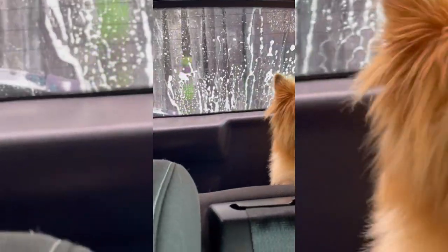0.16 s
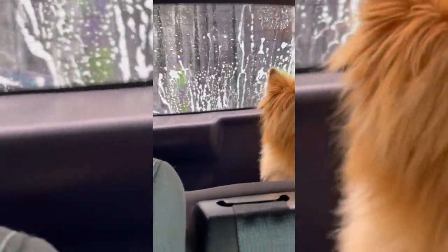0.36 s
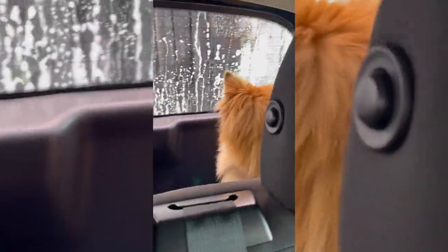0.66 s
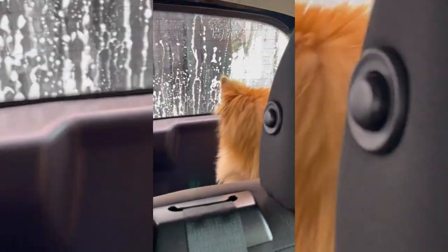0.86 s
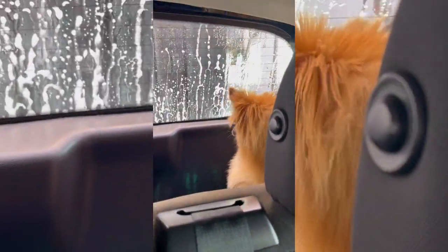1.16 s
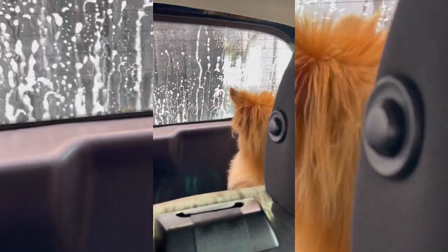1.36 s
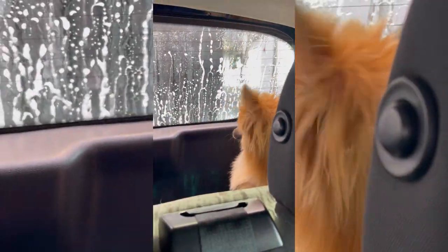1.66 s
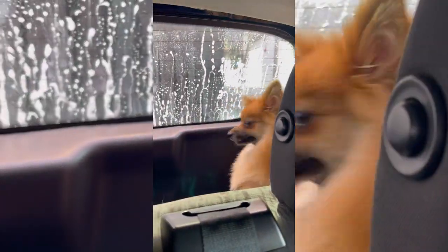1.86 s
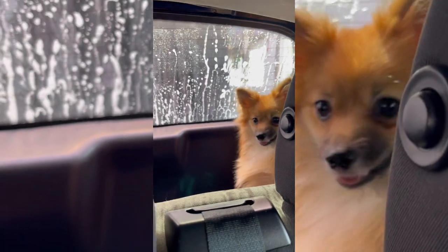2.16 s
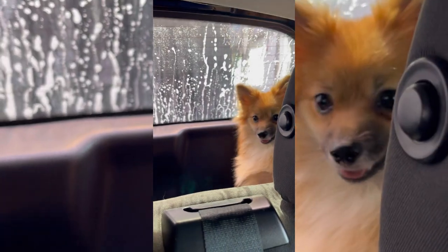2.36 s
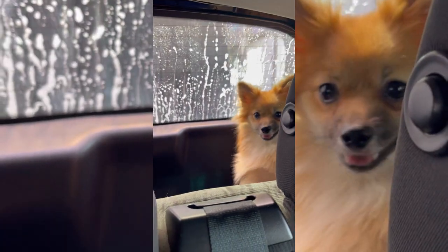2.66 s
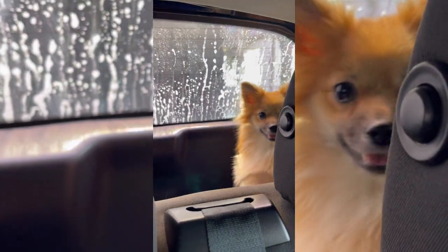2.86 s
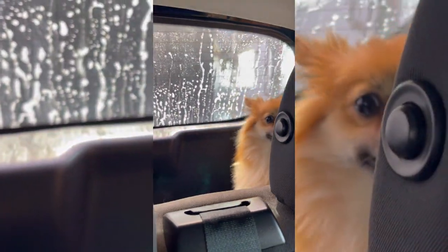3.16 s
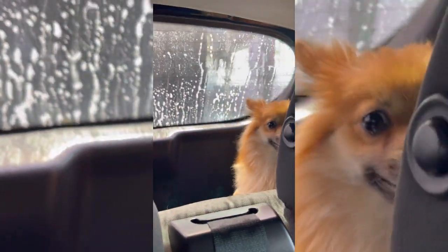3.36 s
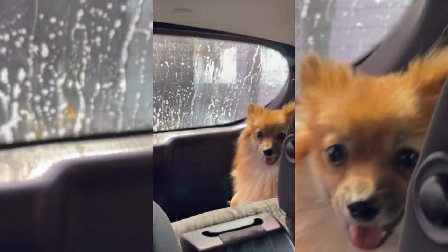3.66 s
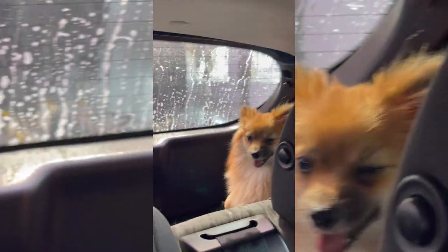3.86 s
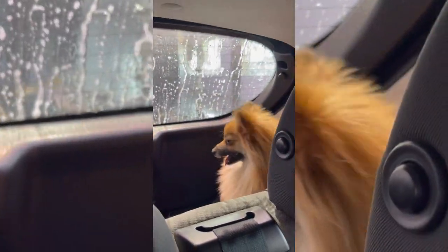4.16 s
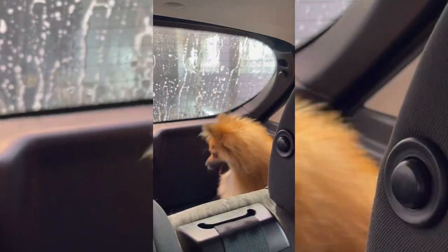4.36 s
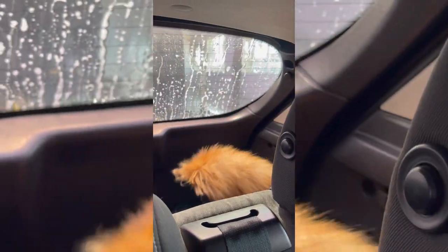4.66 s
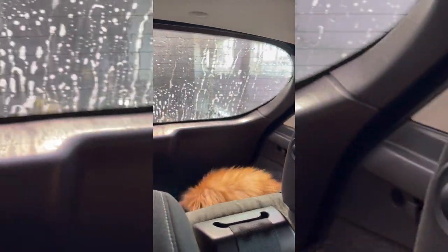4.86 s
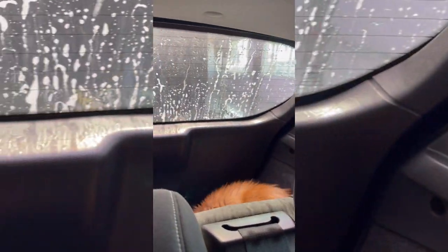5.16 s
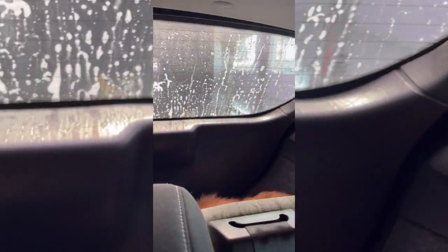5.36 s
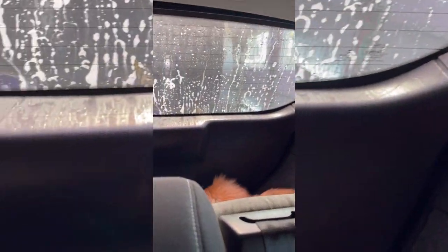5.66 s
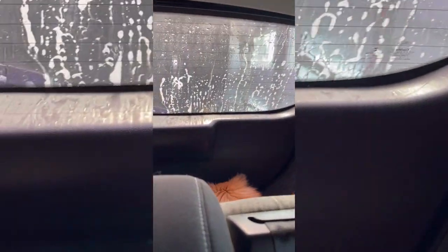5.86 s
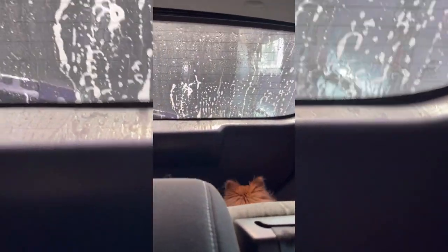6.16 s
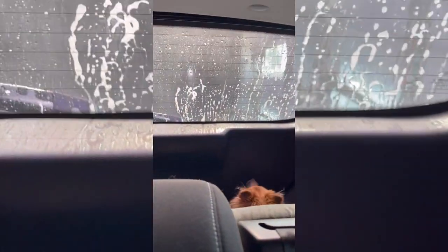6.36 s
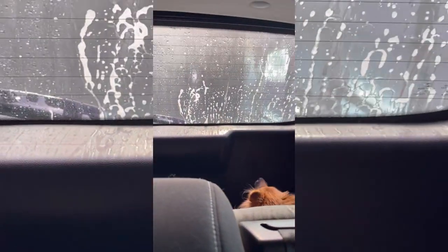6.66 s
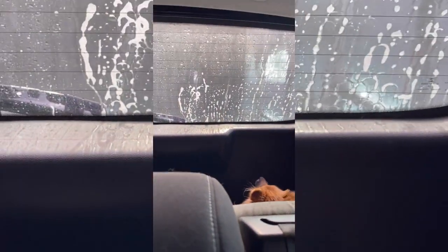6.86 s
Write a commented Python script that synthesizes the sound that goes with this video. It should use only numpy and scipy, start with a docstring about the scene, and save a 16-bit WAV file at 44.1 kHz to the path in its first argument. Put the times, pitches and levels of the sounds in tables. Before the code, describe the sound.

The sound is heard from inside a closed car in an automatic wash. Throughout, pumps make a deep, steady rumble with an uneven drone and a faint wavering motor whine, while water rushes outside, dulled by the windows. From about 0.7 seconds, jets hiss out and back twice a second, strongest around 2 to 3.5 seconds and fading away by about 5.6. Scattered dull thumps of water hit the body between 1 and 4 seconds. From about 4.3 seconds, surges of water drum and slap on the roof and door panels, roughly four a second, with more frequent thumps and a few small splashes. From about 5.5 seconds, close spray sputters and patters on the windows. The spray and the booming on the panels are loudest from 6 seconds to the end at about 7.

```python
"""Inside a closed car in an automatic wash. Pumps rumble, drone and whine: shaped noise and wavering sines.
Water rushes beyond the glass: patchy noise. Jets hiss out and back twice a second: noise in rounded strokes.
Later water drums on the panels and sprays the windows: random impacts ring resonances, with thumps and
splashes at set times. A microphone with two ports listens from the cabin."""
import sys
import numpy as np
from scipy import signal
from scipy.fft import rfft, irfft, next_fast_len
from scipy.io import wavfile
from scipy.ndimage import uniform_filter1d, map_coordinates

SR = 44100
rng = np.random.default_rng(int(sys.argv[2]) if len(sys.argv) > 2 else 0)


def unload_audio(sound):
    """Save the sound as a 16-bit wav file, at the path given as the first command line argument."""
    columns = np.transpose(np.atleast_2d(sound))
    # keep every value between -1 and 1, then stretch to whole-number steps
    steps = np.round(np.clip(columns, -1, 1) * 32767)
    wavfile.write(sys.argv[1], SR, steps.astype(np.int16))


N = 309141

TOP_HZ = 14885
DRONE_HZ, WHINE_HZ = 59.1, 713
DRONE_CUT_DB, BUZZ_DB = -6, -20  # both relative to the drone table
TRIM_DB, FLARE_AT_S, FLARE_S, FLARE_DB = -38.5, 1.767, 0.04, -23
BACK_AFTER_S, BACK_LONGER = 0.15, 1.2  # way back: delay after the way out starts, length ratio
OUT_TAPER, BACK_TAPER = 0.75, 1.35  # below 1 blunt, above 1 pointed
SLAP_CUT_DB = -1.0
THUMP_RISE_S, THUMP_DECAY_S = 0.0019, 0.011
OVERTONE_RATIO, OVERTONE_DB, OVERTONE_SCATTER_DB = 2.22, -8.5, 1.6
PATTER_PER_S, PATTER_SCATTER, PATTER_SPREAD_DB = 460, 0.034, 3  # rate, relative pitch range (+-), size scatter
PATTER_DB, DRIP_DB = -11, -60.5  # patter relative to the spray; drops that fall all the time


def amp(db):
    """Decibels to gain."""
    return 10 ** (np.asarray(db) / 20)


def unit(x):
    """Scale to rms 1."""
    return x / np.sqrt(np.mean(x ** 2) + 1e-20)


def along(points, hz):
    """Read (Hz, value) points on a log frequency axis."""
    f, v = np.transpose(points)
    return np.interp(np.log(hz + 1), np.log(f + 1), v)


def curve(rows):
    """One value per sample from (s, value) rows."""
    return np.interp(np.arange(N) / SR, *np.transpose(rows))


def wobble(rate):
    """A smooth random curve: a spline through rate random values a second."""
    knots = np.arange(0, N * rate / SR + 1, 1 / 8)
    values = rng.standard_normal(int(knots[-1]) + 4)
    return np.interp(np.arange(N) * rate / SR, knots, map_coordinates(values, [knots]))


def filtered(x, response):
    """x times a complex response of frequency."""
    size = next_fast_len(N + SR // 4, real=True)
    return irfft(rfft(x, size) * response(np.fft.rfftfreq(size, 1 / SR)), size)[..., :N]


def rush(patchy_db):
    """Turbulence: two unrelated noises under shared time-frequency patches of random gain."""
    z = signal.stft(rng.standard_normal((2, N)), nperseg=1024)[2]
    field = uniform_filter1d(rng.standard_normal(z.shape[1:]), size=5, axis=0)  # across frequency
    field = uniform_filter1d(field, size=12, axis=1)  # across time
    patchy = z * amp(patchy_db * unit(field))
    return unit(signal.istft(patchy, nperseg=1024)[1][:, :N])


def drops(rate, spread_db):
    """Two unrelated showers of impacts of uneven size, rate a second each."""
    lands = rng.random((2, N)) < rate / SR
    count = lands.sum()
    size_db = spread_db * np.clip(rng.standard_normal(count), -2, 2)
    shower = np.zeros((2, N))
    shower[lands] = rng.choice([-1, 1], count) * amp(size_db)
    return unit(shower)


def at_ports(pair, spectrum):
    """Colour a pair of noises and bring it to the two ports, partly alike and shifted in phase."""
    # between the microphone ports: (frequency [Hz], left lead [rad], likeness [0-1])
    ports = np.array([(150, 0, 1), (300, -.05, .99), (500, 0, .9), (850, .1, .67), (1250, .2, .7),
                      (1450, .05, .55), (1850, .1, .93), (2300, .7, .88), (2900, 1.1, .8), (3500, 1, .6),
                      (4100, 1, .6), (4600, 2.1, .62), (5000, 3.3, .75), (5400, 4.9, .55), (5800, 6.2, .96),
                      (6500, 7, .86), (9100, 9.45, .99), (11500, 11.7, .9), (13000, 12.6, .98)])
    size = next_fast_len(N + SR // 8, real=True)
    hz = np.fft.rfftfreq(size, 1 / SR)
    alike = np.clip(along(ports[:, [0, 2]], hz), 0, 1)
    coloured = rfft(pair, size) * amp(along(spectrum, hz))
    mid, side = coloured * np.sqrt([1 + alike, 1 - alike])
    half_lead = np.exp(.5j * np.interp(hz, ports[:, 0], ports[:, 1]))
    return unit(irfft([(mid + side) * half_lead, (mid - side) / half_lead], size)[:, :N])


def hum(hz, width_hz):
    """An unsteady tone of rms 1: noise in one narrow resonance."""
    return unit(filtered(rng.standard_normal(N), lambda f: 1 / (1 + (2 * (f - hz) / width_hz) ** 2)))


def resonate(x, modes):
    """Ring x in (Hz, width Hz, dB) modes of alternating sign."""
    def response(f):
        return sum((-1) ** k * amp(db) * 1j * f * w / (c * c - f * f + 1j * f * w)
                   for k, (c, w, db) in enumerate(modes))
    return filtered(x, response)


def swell(start, length, taper):
    """One rounded stroke of peak 1; a low taper makes it blunt, a high one pointed."""
    u = (np.arange(N) / SR - start) / length
    inside = (u > 0) & (u < 1)
    gain = np.zeros(N)
    gain[inside] = np.sin(np.pi * u[inside]) ** taper
    return gain


def steadied(x, span_s):
    """Noise of rms 1 with its slow chance swells evened out and its fast ones kept."""
    power = uniform_filter1d(x ** 2, size=int(span_s * SR))
    return unit(x / np.sqrt(np.abs(power) + 1e-12))


def pumps():
    """Broad rumble, cabin modes, a wavering drone that shakes the body, humming trim and a motor whine."""
    # rumble through the body: (frequency [Hz], relative density [dB per Hz])
    rumble_spectrum = [(15, -48), (28, -21), (40, -7), (53, -2), (75, -8.5), (110, -9.5), (190, -9),
                       (255, -13.5), (310, -9), (380, -13), (480, -22.5), (650, -54), (1100, -90)]
    # rumble: (time [s], level [dB])
    rumble_level = [(0, -29), (1.2, -29), (2.4, -28), (3.9, -26), (4.2, -29.5), (4.75, -28), (5.6, -27),
                    (7.01, -25.5)]
    # cabin air modes: (frequency [Hz], width [Hz], level [dB])
    cabin_modes = [(49, 6, -35.5), (88.6, 26, -34.5), (129, 30, -38), (158.3, 9.1, -42), (297, 22, -42.5)]
    # drone before its cut, reference of the buzz: (time [s], level [dB])
    drone_table = [(0, -25), (.35, -24), (.48, -23), (.77, -19), (.86, -23), (1.15, -22.5), (1.3, -14.5),
                   (1.55, -21), (1.9, -21.5), (2.05, -29), (2.7, -36), (2.97, -21.5), (3.2, -33),
                   (3.85, -27), (4.2, -28.5), (4.72, -47), (5.6, -25.5), (6.2, -26), (6.5, -30),
                   (7.01, -33)]
    # motor whine: (time [s], level [dB])
    whine_level = [(.2, -60), (.3, -47), (.5, -53), (.62, -63), (1.15, -51), (1.45, -58), (1.6, -45),
                   (1.85, -52), (1.98, -62), (2.15, -47.5), (2.35, -57), (2.55, -48), (2.9, -50.5),
                   (3.05, -61), (3.3, -51.5), (4.2, -53.5), (7.01, -45.5)]
    t = np.arange(N) / SR
    rumble = amp(curve(rumble_level) + 0.23 * wobble(5.9)) * at_ports(rush(patchy_db=0.6), rumble_spectrum)
    booms = sum(amp(db) * hum(hz, width) for hz, width, db in cabin_modes)

    drone_db = curve(drone_table)
    drone_tone = unit(np.sin(2 * np.pi * DRONE_HZ * t + 0.7 * wobble(6.0)))
    drone = amp(drone_db + DRONE_CUT_DB + 1.1 * wobble(5.33)) * drone_tone
    buzz = amp(drone_db + BUZZ_DB) * hum(hz=250, width_hz=120)

    # the trim hums in sympathy and flares up once
    flare = np.exp(-.5 * ((t - FLARE_AT_S) / FLARE_S) ** 2)
    trim = (amp(TRIM_DB) + amp(FLARE_DB) * flare) * hum(hz=182.2, width_hz=28)
    whine_tone = unit(np.sin(2 * np.pi * WHINE_HZ * t + 0.91 * wobble(20)))
    whine = amp(curve(whine_level) + 1.4 * wobble(9)) * whine_tone
    return rumble + booms + drone + buzz + trim + whine


def falling_water():
    """The wash all around: patchy turbulent noise, dulled by the closed windows."""
    # (frequency [Hz], relative density [dB per Hz])
    wash_spectrum = [(250, -22), (420, -3.5), (560, -6), (700, -7), (800, -13), (930, -12.5), (1400, -14),
                     (1900, -21.5), (2600, -26.5), (4200, -29), (6200, -30), (7800, -38.5), (10700, -37),
                     (12500, -75)]
    # rises as the jets reach the car: (time [s], level [dB])
    flow_level = [(0, -41.5), (1.3, -38.5), (2.2, -40), (5.2, -37.5), (5.6, -34.5), (7.01, -35)]
    return amp(curve(flow_level) + 0.71 * wobble(12)) * at_ports(rush(patchy_db=1.0), wash_spectrum)


def pane_drops():
    """Each drop rings one mode of the wet pane, a little higher or lower; decay follows mode width."""
    # window pane modes: (frequency [Hz], width [Hz], relative level [dB])
    pane_modes = np.array([(2320, 50, 0.5), (2705, 34, -2), (2970, 45, -21), (3496, 28, -2.5),
                           (4050, 69, -1), (4440, 50, 2)])
    t = np.arange(SR // 32) / SR
    count = int(PATTER_PER_S * N / SR)
    when, mode, side, pitch, size = rng.random((count, 5)).T
    hz, width, db = pane_modes[(mode * len(pane_modes)).astype(int)].T
    hz = hz * (1 + PATTER_SCATTER * (2 * pitch - 1))
    gain = amp(db - PATTER_SPREAD_DB * np.log(np.maximum(size, 1 / 20)))
    decay = np.exp(-np.pi * width[:, None] * t)
    rings = gain[:, None] * decay * np.sin(2 * np.pi * hz[:, None] * t)
    # both channels lie end to end; half the drops go to the second
    at = (when * (N - len(t))).astype(int) + N * (side < .5)
    places = at[:, None] + np.arange(len(t))
    return unit(np.bincount(places.ravel(), rings.ravel(), 2 * N).reshape(2, N))


def window_spray():
    """Close spray sputters on the glass: a dense shower, and heavier drops that ring the pane."""
    # (frequency [Hz], relative density [dB per Hz])
    spray_spectrum = [(500, -6.5), (1000, -1.5), (1500, -8.5), (1900, -8), (2300, -4.5), (2700, -3),
                      (3200, -6.5), (4300, -6), (5200, -7.5), (8000, -8), (10700, -2.5), (12000, -11.5),
                      (13200, -27), (14500, -48)]
    # spray closing in on the windows: (time [s], level [dB])
    approach_level = [(0, -77), (3, -65), (4.15, -57), (4.36, -49), (4.75, -57.5), (5.2, -57), (5.57, -44),
                      (5.8, -45.5), (6.08, -35.5), (6.47, -34), (6.53, -41), (6.57, -35), (7.01, -33)]
    spray = amp(curve(approach_level) + 0.76 * wobble(40))
    shower = rush(patchy_db=3.0) + 0.61 * drops(rate=1200, spread_db=0.0)
    patter = at_ports(pane_drops(), [(1200, -15), (2200, 0.5), (4600, -1), (7000, -15)])
    patter_gain = np.hypot(amp(PATTER_DB) * spray, amp(DRIP_DB))
    return spray * at_ports(shower, spray_spectrum) + patter_gain * patter


def swinging_jets():
    """Fine mist hisses on each nozzle stroke; the way back is tilted in tone and swells more gently."""
    # (frequency [Hz], relative density [dB per Hz])
    jet_spectrum = [(1200, -48), (2200, -2.5), (3200, -7.5), (4200, -3.5), (5200, -2.5), (6300, -0.3),
                    (7300, 1), (8800, -8), (10700, 3.5), (12000, -9.5), (13000, -31), (14000, -60)]
    # nozzle swings: (start [s], out-stroke length [s], out level [dB], back level [dB])
    swings = [(0.699, 0.19, -51, -48), (1.186, 0.21, -43.5, -44), (1.695, 0.22, -42.5, -43),
              (2.213, 0.22, -41.5, -42), (2.726, 0.22, -40.5, -42.5), (3.235, .22, -41.5, -43),
              (3.743, 0.24, -44, -45.5), (4.246, 0.26, -48, -50), (4.763, 0.29, -51, -52),
              (5.286, 0.17, -50.5, -50)]
    # tone of the way back: (frequency [Hz], gain [dB])
    back_tilt = [(5000, -0.5), (7500, -1), (10500, 0.5)]

    def mist():
        return at_ports(rush(patchy_db=1.5) + .5 * drops(rate=3000, spread_db=4.5), jet_spectrum)

    out_gain = sum(amp(out_db) * swell(s, length, taper=OUT_TAPER) for s, length, out_db, _ in swings)
    back_gain = sum(amp(back_db) * swell(s + BACK_AFTER_S, BACK_LONGER * length, taper=BACK_TAPER)
                    for s, length, _, back_db in swings)
    back_mist = filtered(mist(), lambda hz: amp(along(back_tilt, hz)))
    return amp(0.88 * wobble(28)) * (out_gain * mist() + back_gain * back_mist)


def thumps():
    """A heavy slug dents a panel, which swings back a few times; its second mode dies twice as fast."""
    # single slugs: (time [s], level [dB], pitch [Hz])
    slugs = [(.968, -12.5, 93), (1.239, -18, 104), (1.31, -15, 119), (1.437, -11, 90), (1.806, -14, 180),
             (1.967, -15, 190), (2.329, -15.5, 178), (2.806, -17, 126), (3.817, -14, 55), (4.839, -13, 140),
             (4.874, -18, 177), (5.054, -12, 185), (5.114, -12, 152), (5.376, -11, 117), (5.401, -9.5, 130),
             (5.834, -15, 283), (6.08, -12, 140), (6.389, -14, 116), (6.429, -13, 105), (6.606, -13, 172),
             (6.623, -12, 116), (6.734, -14, 140), (6.964, -9, 124)]
    out = np.zeros(N)
    t = np.arange(SR // 8) / SR
    fade = np.exp(-t / THUMP_DECAY_S)
    rise = 1 - np.exp(-t / THUMP_RISE_S)
    for s, db, hz in slugs:
        phase = 2 * np.pi * hz * t
        overtone_gain = amp(OVERTONE_DB + rng.normal(0, OVERTONE_SCATTER_DB))
        ring = fade * np.sin(phase) + overtone_gain * fade ** 2 * np.sin(OVERTONE_RATIO * phase)
        room = out[round(s * SR):][:len(t)]
        room += (amp(db) * ring * rise)[:len(room)]
    return out


def splats():
    """Single heavy splashes, each a short noise burst in the band of the spot that it hits."""
    # (time [s], centre [Hz], width [Hz], life: twice the rise to the peak [s], level [dB])
    splashes = [(4.045, 880, 260, 0.022, -34), (4.6, 3500, 5000, .003, -44),
                (5.16, 10500, 1300, .0099, -48), (5.251, 2490, 1600, 0.0048, -43),
                (6.1, 2550, 200, .018, -41), (6.115, 3500, 120, .014, -47), (6.428, 2870, 110, 0.015, -33),
                (6.43, 2340, 120, .018, -41), (6.595, 3460, 110, .025, -42), (6.635, 2690, 110, .025, -41),
                (6.74, 2250, 90, 0.018, -47)]
    out = np.zeros((2, N))
    t = np.arange(SR // 4) / SR
    for s, hz, width_hz, life, db in splashes:
        edges = [hz - width_hz / 2, hz + width_hz / 2]
        band = signal.butter(3, edges, "bandpass", fs=SR, output="sos")
        burst = unit(signal.sosfilt(band, rng.standard_normal((2, len(t)))))
        envelope = (2 * t / life) * np.exp(1 - 2 * t / life)
        out[:, round(s * SR):][:, :len(t)] += amp(db) * burst * envelope
    return out


def drumming():
    """Surges throw slugs of water at the car: panels boom and a door skin rings under a wider slap."""
    # roof and door panels: (frequency [Hz], width [Hz], relative level [dB])
    panel_modes = [(105.7, 19, -3.5), (127.6, 19.2, 0.5), (159, 22, -2.5), (209, 45, -8)]
    # water on sheet metal: (frequency [Hz], relative density [dB per Hz])
    slap_spectrum = [(120, -13), (240, 1), (330, -4), (400, 0), (470, -3.5), (620, -11.5), (900, -16),
                     (1300, -29), (2500, -32), (5000, -68)]
    # (middle [s], length [s], boom level [dB], slap level before its cut [dB], door level [dB])
    surges = np.array([(4.371, 0.25, -27, -25, -36.5), (4.58, 0.21, -41, -27, -30.5),
                       (4.875, 0.18, -24, -30.5, -26), (5.079, 0.21, -22.5, -30, -26),
                       (5.39, 0.17, -24, -31, -30.5), (5.588, 0.27, -27.5, -28.5, -33.5),
                       (5.913, 0.25, -28.5, -28, -27.5), (6.11, 0.17, -18, -24, -30),
                       (6.417, 0.21, -16.5, -23.5, -34), (6.633, 0.18, -14.5, -26, -33),
                       (6.76, 0.086, -29, -34, -39), (6.942, .23, -17.5, -23.5, -29)])
    shapes = np.array([swell(s - length / 2, length, taper=1.13) for s, length, *_ in surges])
    boom_peak, slap_peak, door_peak = amp(surges[:, 2:].T)
    # the slap spreads over the whole surge; the boom gathers at its middle
    boom_gain = boom_peak @ shapes
    slap_gain = amp(SLAP_CUT_DB) * slap_peak @ shapes ** 0.47
    door_gain = door_peak @ shapes ** 0.58

    def soft(f):
        """Stiff panels pass no deep bass; soft water contact gives no treble."""
        return (f / 80) ** 4 / (1 + (f / 80) ** 4) / (1 + (f / 450) ** 4)

    slugs = drops(rate=450, spread_db=3.0)
    boom = steadied(filtered(resonate(slugs[0], panel_modes), soft), span_s=0.062)
    slap = at_ports(slugs + 1.08 * rush(patchy_db=1.5), slap_spectrum)
    door = steadied(hum(hz=293.4, width_hz=17), span_s=0.03)
    return boom_gain * boom + slap_gain * slap + door_gain * door


def cabin(x, wet):
    """Glass and trim close by return weak copies, which ripple the spectrum."""
    walls = np.zeros(SR // 16)
    delays_s = rng.uniform(.003, .03, size=12)
    echoes = unit(rng.standard_normal(len(delays_s))) / np.sqrt(len(delays_s))
    walls[(delays_s * SR).astype(int)] = wet * echoes
    walls[0] = 1  # direct sound
    return signal.fftconvolve(x, walls[None] / np.linalg.norm(walls), axes=1)[:, :N]


def scene():
    """Machines and panels sound through the body; the water's hiss comes in by the windows."""
    through_body = pumps() + drumming() + thumps()
    by_windows = falling_water() + swinging_jets() + window_spray() + splats()
    return through_body + cabin(by_windows, wet=0.24)


def record(dry):
    """The recorder keeps nothing above its band limit."""
    return filtered(dry, lambda hz: hz < TOP_HZ)


dry = scene()
out = record(dry)
unload_audio(out)
```